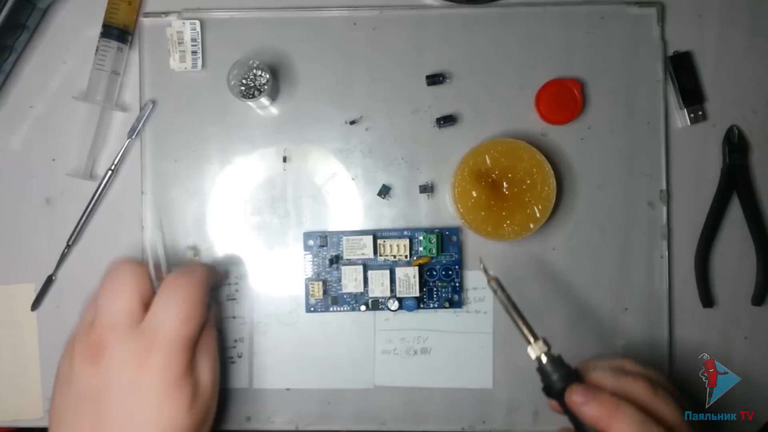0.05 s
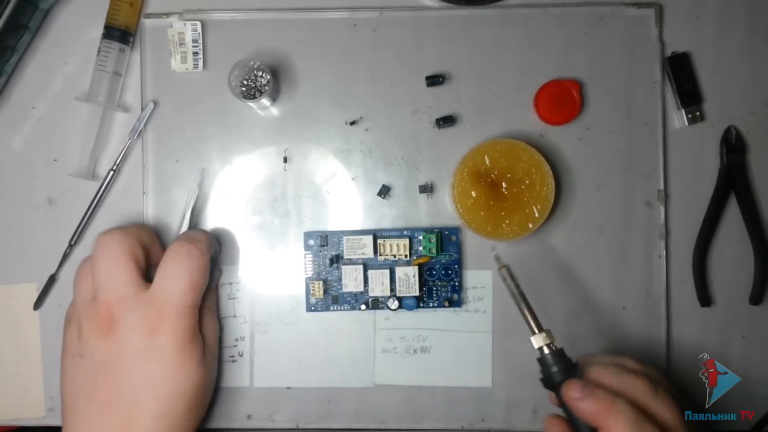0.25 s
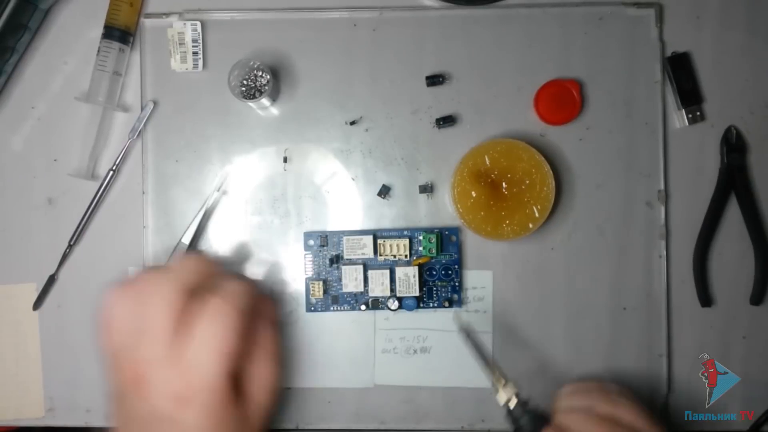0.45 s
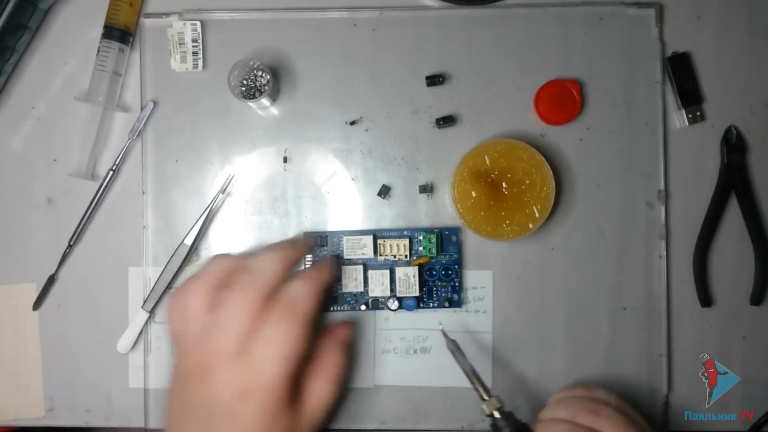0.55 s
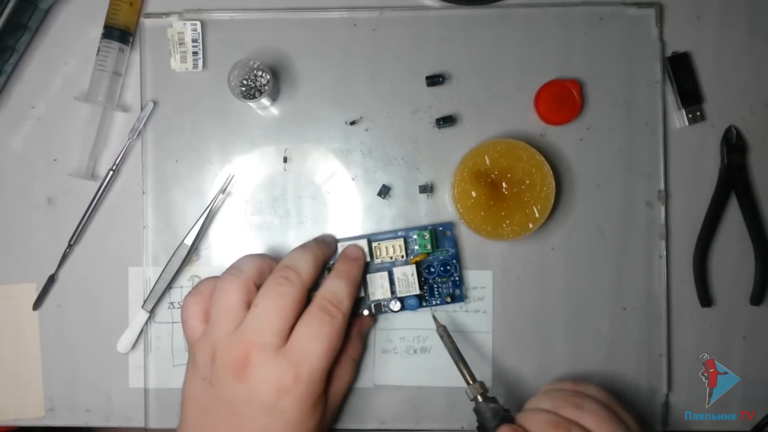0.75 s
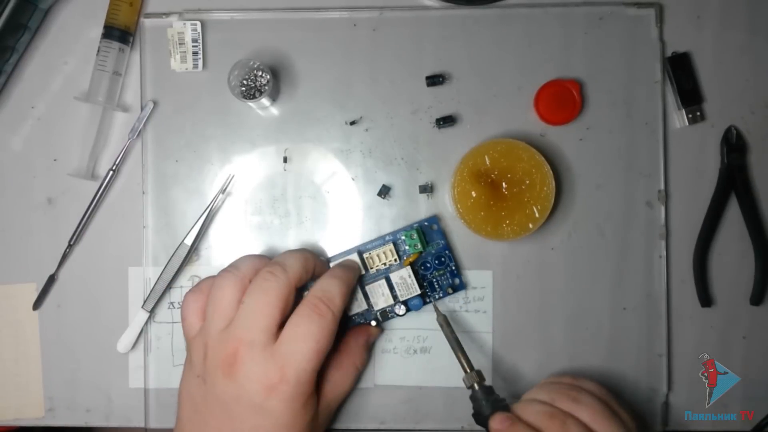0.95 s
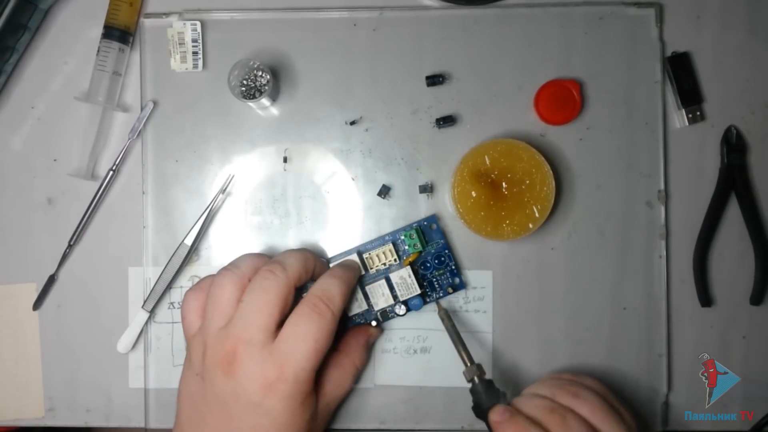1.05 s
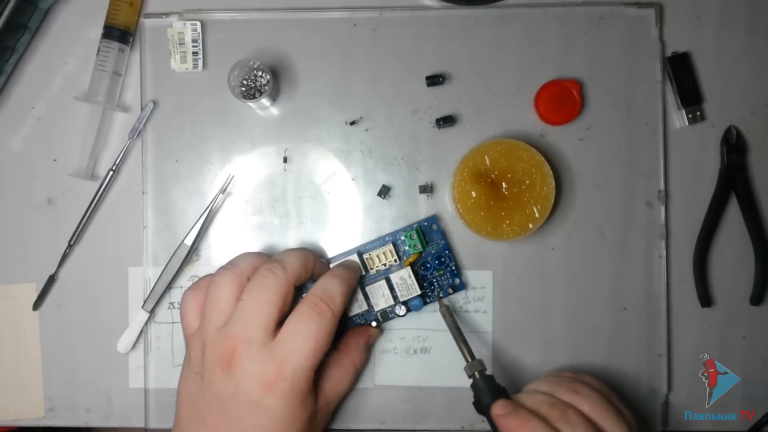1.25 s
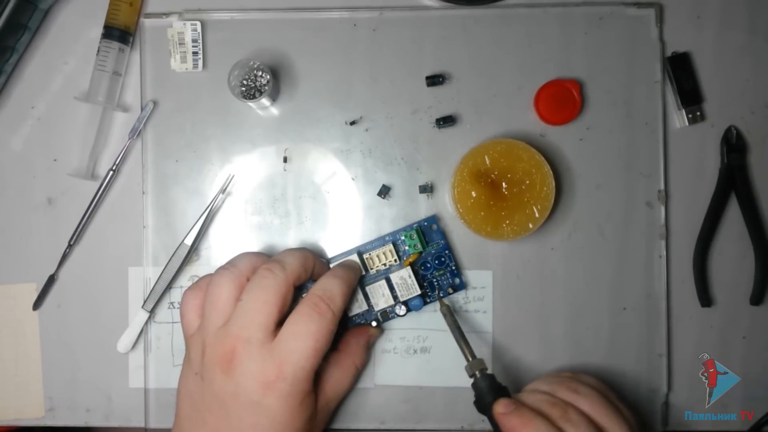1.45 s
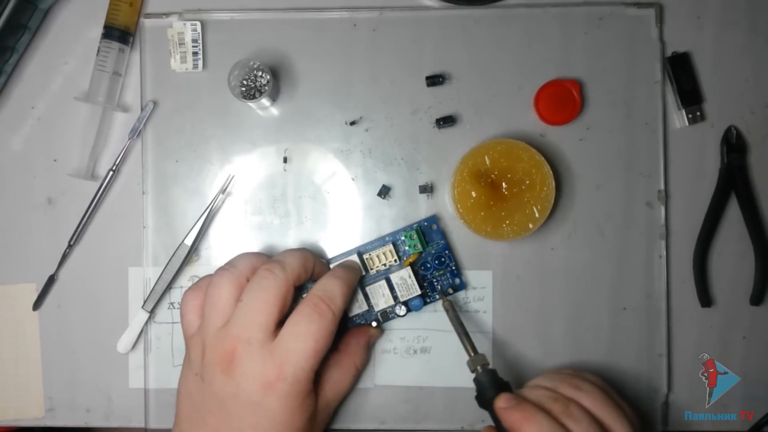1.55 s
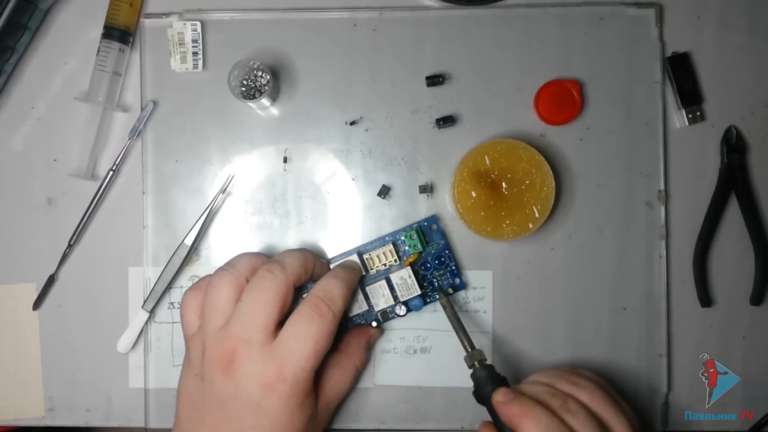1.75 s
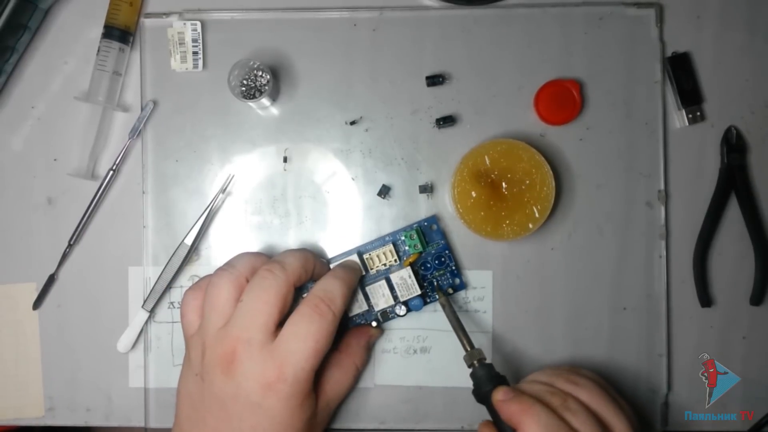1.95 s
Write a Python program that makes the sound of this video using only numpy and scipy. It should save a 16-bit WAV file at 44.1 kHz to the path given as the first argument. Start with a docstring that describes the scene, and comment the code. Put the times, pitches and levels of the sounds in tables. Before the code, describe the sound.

Steel tweezers dropped on glass rattle brightly to rest, followed by dull circuit board taps

```python
"""A quiet room hums, rumbles and hisses throughout, as shaped noise and narrow noise bands.
At 0.22 s steel tweezers drop on a glass-topped bench: struck modes ring, clack and crack, chattering to rest.
From 0.78 s a small circuit board, nearer the microphones, taps the glass with duller struck modes.
From about 1 s fingers and tip scuff softly, as swells of noise. Two close microphones take the hits and
their room sound, each with its own treble colour."""
import sys
import numpy as np
from scipy import signal
from scipy.fft import rfft, irfft
from scipy.io import wavfile
from scipy.ndimage import uniform_filter1d

SR = 44100
rng = np.random.default_rng(int(sys.argv[2]) if len(sys.argv) > 2 else 0)


def elevation(decibels):
    """Turn decibel levels (scalar or array-like) into linear amplitude ratios."""
    levels = np.asarray(decibels, float)
    return 10 ** (levels / 20)


def dump_mix(stems):
    """Bounce the given channels to the path in sys.argv[1] as a 16-bit WAV at rate SR."""
    frames = np.atleast_2d(stems).T  # one column per channel
    limited = np.clip(frames, -1, 1)  # hard clip at full scale
    pcm = np.round(limited * 32767).astype(np.int16)
    wavfile.write(sys.argv[1], SR, pcm)


N = 88200

# the tweezers strike the glass; clack and body levels are relative to the blow, pan is left over right:
# (t/s, blow level/dB, clack level/dB, clack f/Hz, glass body level/dB, pan/dB)
TWEEZER_BOUNCES = [(0.2177, -11, -21.5, 3275, -24, -2), (0.2303, -20, -20.5, 3150, -26, -2.5),
                   (0.2694, -19.5, -12.5, 3130, -17.5, -3.5), (0.291, -19.5, -7, 3230, -23.5, 3),
                   (0.3116, -18.5, -16.5, 3070, -21, -4.5), (0.3296, -11.5, -19, 3100, -22, -7),
                   (0.338, -14, -19.5, 3200, -18.5, -1.5), (0.3521, -17.5, -20.5, 3090, -10.5, -1),
                   (0.3716, -13.5, -11, 3100, -11.5, -0.5), (0.3863, -17, -17, 3140, -14.5, -5),
                   (0.3951, -16.5, -19, 3000, -13, -1), (0.42, -17, -10, 3410, -13.5, 2.5),
                   (0.4339, -12.5, -14.5, 3210, -19.5, -7), (0.4410, -22, -10.5, 3200, -24, 13.5),
                   (0.4524, -22, -22.5, 2990, -17, -2), (0.4636, -18, -25.5, 3000, -24, -6),
                   (0.4755, -17, -13, 3090, -18.5, -4), (0.4926, -17, -13.5, 3280, -17, -9.5),
                   (0.5124, -23, -8.5, 3100, -18, 12.5), (0.52, -23, -18, 3120, -26, -2.5),
                   (0.5344, -22.5, -16, 3500, -18, 3.5), (0.5441, -25, -21.5, 3400, -29.5, 11),
                   (0.562, -19.5, -30, 3150, -38, -6)]


def rms_one(x):
    """Scale to unit rms."""
    return x / np.sqrt(np.mean(x ** 2) + 1e-30)


def at_hz(points, hz):
    """Read a (f/Hz, value) table on a log frequency axis."""
    table_hz, values = np.array(points).T
    return np.interp(np.log(np.maximum(hz, 1)), np.log(table_hz), values)


def coloured(spectrum, alike=1.0):
    """Stereo noise with the given spectrum and left-right likeness (clipped to 0..1); rms 1."""
    hz = np.fft.rfftfreq(N, 1 / SR)
    mid, side = rfft(rng.standard_normal((2, N)))
    likeness = np.clip(at_hz(alike, hz) if np.ndim(alike) else alike, 0, 1)
    pair = np.sqrt(1 + likeness) * mid + np.sqrt(1 - likeness) * side * [[1], [-1]]
    return rms_one(irfft(elevation(at_hz(spectrum, hz)) * pair, N))


def high_pass(x, hz):
    """Steep bass cut: fourth-order Butterworth."""
    return signal.sosfilt(signal.butter(N=4, Wn=hz, btype="high", fs=SR, output="sos"), x)


def ring(clicks, hz, t60):
    """A two-pole resonator: a unit click sets a sine of height 1 ringing, 60 dB down after t60 seconds."""
    r = elevation(-60 / (t60 * SR))
    w = 2 * np.pi * hz / SR
    return signal.lfilter([0, np.sin(w)], [1, -2 * r * np.cos(w), r * r], clicks + 1e-18)


def train(s, size, pan_db):
    """Stereo clicks at the given times; positive pan is louder on the left."""
    out = np.zeros((2, N))
    for ch, sign in enumerate((.5, -.5)):
        np.add.at(out[ch], (s * SR).astype(int), size * elevation(sign * pan_db))
    return out


def strike(modes, s, db, pan_db, spread_db, scatter_db):
    """Every blow strikes every mode with its own strength, sign and slightly different balance."""
    luck = rng.standard_normal(size=(len(s), len(modes), 3))
    total = 0
    for k, (hz, mode_db, t60) in enumerate(modes):
        size = elevation(db + mode_db + spread_db * luck[:, k, 0]) * np.sign(luck[:, k, 1])
        total = total + ring(train(s, size, pan_db + scatter_db * luck[:, k, 2]), hz, t60)
    return total


def crack(s, db, pan_db, t60, alike):
    """Contact noise at each blow: it swells in under a millisecond and dies within milliseconds."""
    # colour of the contact: (f/Hz, level per Hz/dB)
    contact = [(180, -57), (300, -38), (803, -17.5), (915, -26.5), (2450, -16.5), (3080, 0), (3940, -8.5),
               (8520, -1), (13700, -11), (15100, -24.5)]
    rise = np.exp(-1 / (0.00047 * SR))   # rise time constant 0.47 ms
    poles = np.convolve([1, -rise], [1, -elevation(-60 / (t60 * SR))])
    envelope = signal.lfilter([1 - rise], poles, train(s, elevation(db), pan_db))
    return coloured(contact, alike) * envelope


def background():
    """Deep rumble, room rumble with a wavering hum of noise-driven resonances, and hiss."""
    # how the background level drifts: (t/s, deep rumble level/dB, hum and rumble level/dB, hiss level/dB)
    drift = [(0, -70, -57.5, -62.5), (0.1, -68, -59, -64), (.3, -89, -61, -67.5),
             (0.721, -76.5, -64, -68.5), (1.0, -79, -66.5, -69.5), (1.3, -81.5, -67.5, -71),
             (1.499, -69.5, -64.5, -66.5), (1.701, -69.5, -61.5, -65.5), (2, -64.5, -60.5, -64)]
    # noise colours: (f/Hz, level per Hz/dB)
    deep_colour = [(15, -49), (25, -16), (49, -18), (81, 14.5), (120, -12), (160, -51.5), (260, -120)]
    rumble_colour = [(65, -44), (110, -13), (209, 7), (260, -5.5), (446, -8), (796, -8.5), (907, -9.5),
                     (1000, -21.5), (1560, -52.5), (2640, -120)]
    hiss_colour = [(590, -32.5), (1000, 2.5), (3570, -1), (5690, -6), (7560, -7), (8190, -1.5), (8870, -8),
                   (13400, -12), (14600, -16.5), (15100, -25.5)]
    # hum bands: (f/Hz, level over the rumble/dB, approximate width/Hz)
    hum_bands = [(217, -10.5, 22), (886.4, -15, 6), (84, -16, 5.4)]
    # how alike the background is left and right: (f/Hz, left-right likeness before clipping)
    likeness = [(60, 0.91), (180, 1), (540, 0.64), (1630, -0.33), (4890, -0.11), (14700, -1.4)]
    s, *levels_db = np.transpose(drift)
    deep, rumble, hiss = (elevation(np.interp(np.arange(N) / SR, s, db)) for db in levels_db)
    hum = sum(elevation(db) * rms_one(ring(rng.standard_normal(N), hz, 1.9 / width))
              for hz, db, width in hum_bands)
    return (deep * coloured(deep_colour, likeness)
            + rumble * (coloured(rumble_colour, likeness) + hum)
            + hiss * coloured(hiss_colour, likeness))


def soft_knocks(knocks, softness, hz, t60):
    """Clicks blunted over some samples of contact ring one low mode."""
    s, db = np.transpose(knocks)
    return ring(uniform_filter1d(train(s, elevation(db), 0), size=softness), hz, t60)


def tweezers():
    """Firm bounces plus random chatter ring the steel and the glass, with cracks and low knocks."""
    # the loose tips chatter; the floor of their level: (t/s, level/dB)
    chatter = [(0.219, -39), (.3, -48), (.34, -49), (.5, -38), (.55, -34), (0.592, -38), (0.622, -45.5),
               (.65, -80)]
    # tweezers mode frequencies (f/Hz), and in the same order (level/dB, t60/s)
    steel_hz = [4407, 4845, 5934, 6235, 6640, 7012, 7237, 7892, 8270, 8582, 8900, 10004, 11319, 12232,
                13347]
    steel_ring = [(-14, .15), (-17.5, 0.1), (-18.5, 0.069), (0.5, 0.051), (-11.5, 0.089), (-11, 0.2),
                  (-10, 0.14), (-10.5, 0.22), (2.5, 0.032), (-6, 0.18), (-9.5, 0.094), (-10, 0.28),
                  (-4, 0.14), (-7, 0.12), (-10, 0.25)]
    # steel modes hardly struck until the tweezers roll over (f/Hz)
    shielded_hz = [6235, 8582, 10004]
    # body modes of the glass top: (f/Hz, level/dB, t60/s)
    glass = [(757, -16.5, 0.04), (802, -13.5, 0.061), (1063, -17, .03), (1197, -11, 0.05),
             (1544, -12.5, .02), (1875, -12.5, 0.022), (2114, -5, 0.018), (4460, -0.5, 0.014)]
    # light touches clack: (f/Hz, level/dB, t60/s)
    chatter_clack = [(2920, -9.5, 0.0023), (3150, -15, .007), (3200, -13.5, .007)]
    # low thuds of the bench during the clatter: (t/s, click level/dB)
    thuds = [(.24, -51), (0.288, -59), (0.336, -50.5), (0.364, -49.5), (0.45, -63.5), (0.498, -55)]
    # flat landings also knock low: (t/s, click level/dB)
    knocks = [(0.2186, -47.5), (0.2966, -56.5), (.33, -44.5), (0.3934, -45.5)]
    chatter_count, chatter_spread_db = 170, 4
    steel_db, glass_db, crack_db = -23.5, -7.5, -8.5   # added to the blow level
    roll_s, shield_db = .32, -9
    rest_s, rest_db_per_s = 0.531, 159   # lying flat on the glass damps the steel

    s, db, _, _, body_db, pan_db = np.transpose(TWEEZER_BOUNCES)
    when, level_db = np.transpose(chatter)
    c_s = when[0] + (when[-1] - when[0]) * rng.random(chatter_count)
    excess = np.minimum(rng.exponential(1, chatter_count), 3)
    c_db = np.interp(c_s, when, level_db) + chatter_spread_db * excess
    all_s, all_db = np.r_[s, c_s], np.r_[db, c_db]
    all_pan = np.r_[pan_db, np.full(chatter_count, -4.0)]
    all_body = np.r_[body_db, np.full(chatter_count, -15.0)]

    modes, shielded = np.c_[steel_hz, steel_ring], np.isin(steel_hz, shielded_hz)
    steel = 0
    for late in (False, True):
        blow_db = all_db + steel_db + late * shield_db * (all_s < roll_s)
        steel = steel + strike(modes[shielded == late], all_s, blow_db, all_pan, spread_db=4.5, scatter_db=6.5)
    damping = elevation(-rest_db_per_s * np.maximum(np.arange(N) / SR - rest_s, 0))
    bright = (damping * steel
              + strike(chatter_clack, c_s, c_db, -0.84, spread_db=4.0, scatter_db=3.5)
              + crack(all_s, all_db + crack_db, all_pan, t60=0.012, alike=.4))
    body = strike(glass, all_s, all_db + all_body + glass_db, 0.37 * all_pan, spread_db=6.0, scatter_db=3.5)
    return (high_pass(bright, 1200) + high_pass(body, 620)
            + soft_knocks(thuds, softness=150, hz=130.1, t60=0.17)
            + soft_knocks(knocks, softness=30, hz=434, t60=0.017))


def clacks():
    """Each bounce rings one short mode at the pitch of the spot it hits."""
    gain_db, t60 = 6.5, .009   # added to every clack; s
    total = 0
    for s, db, clack_db, hz, _, pan_db in TWEEZER_BOUNCES:
        click = train(np.array([s]), elevation(db + clack_db + gain_db), 0.33 * pan_db)
        total = total + ring(click, hz, t60)
    return total


def room(x):
    """Quick scatter off the bench and a longer tail, as dying noise of its own in each ear."""
    t = np.arange(SR // 2) / SR
    tails = 0
    # bench, then room: level/dB, t60/s, gap before the first reflection/s
    for db, t60, gap in ((4, 0.019, .0006), (0.5, 0.17, 0.0056)):
        tail = rng.standard_normal((2, len(t))) * elevation(-60 * t / t60) * (t > gap)
        tails = tails + elevation(db) * tail / np.sqrt((tail ** 2).sum(axis=1, keepdims=True))
    return signal.fftconvolve(x, tails, axes=1)[:, :N]


def board():
    """Dull plastic-and-fibre taps; where the board is hit sets each tap's share of the mode groups."""
    # taps on the glass, shares relative to the tap: (t/s, tap level/dB, then level/dB of
    # flat body, edge, middle, upper middle, treble, top)
    tap_table = [(0.7800, -35, -36, -28, -7.5, -15, -24, 3), (0.7818, -32.5, -23, -8.5, -10, -7, -11, -0.5),
                 (0.7929, -20.5, -32, -23, -41, -21, -17, -2), (0.8084, -35, -28, -27, -14, -15, -7.5, 1),
                 (0.8181, -44, -17, -16, -21, -6, -24, -7), (1.0238, -34, -13.5, -13.5, -2.5, -8, -12, 0),
                 (1.208, -47, -36, -5, -13, -4, 2, -3.5)]
    # board modes, in the order of the shares: (f/Hz, level/dB, t60/s)
    flat_body = [(530, 0.5, 0.093), (789, 9.5, 0.051), (1187, 3.5, 0.053)]
    edge = [(927, 1, 0.036), (1065, -4, .02), (1794, -3.5, 0.031), (1970, -6.5, 0.024)]
    middle = [(2240, -1.5, 0.0086), (2707, -1.5, 0.0086), (3096, 6.5, 0.0062)]
    upper_middle = [(3580, 6.6, 0.0061), (4080, 3.9, 0.016)]
    treble = [(5060, 5.5, 0.01), (6200, 3.3, 0.0089), (6800, 1.3, 0.017)]
    top = [(7880, -5.5, 0.007), (8230, -3, 0.017), (9200, -11.5, 0.012), (9810, -40, 0.01),
           (12700, -33, .006)]
    pan_db, crack_db = -2, -9
    s, db, *shares_db = np.transpose(tap_table)
    groups = (flat_body, edge, middle, upper_middle, treble, top)
    taps = sum(strike(modes, s, db + share_db, pan_db, spread_db=3.5, scatter_db=4.5)
               for modes, share_db in zip(groups, shares_db))
    return high_pass(taps + crack(s, db + crack_db, pan_db, t60=0.023, alike=0.27), 430)


def scuffs():
    """Fingers and tip scuff: short half-sine swells of soft bright noise."""
    # the swells: (t/s, length/s, level/dB)
    swells = [(0.989, 0.038, -65), (1.373, 0.043, -67.5), (1.619, 0.034, -66), (1.791, 0.045, -62),
              (1.956, 0.047, -63)]
    # their colour: (f/Hz, level per Hz/dB)
    colour = [(800, -8), (3000, 1.5), (5000, 4), (8200, 3.5), (11000, 0), (15000, -6)]
    t = np.arange(N) / SR
    swell = sum(elevation(db) * np.sin(np.pi * np.clip((t - s) / length, 0, 1)) for s, length, db in swells)
    return coloured(colour, 0.29) * swell


def microphones(direct, reflected):
    """Direct sound reaches the left a little later; a resonance lifts each microphone's own treble band."""
    # left microphone, then right: (f/Hz, width/Hz, lift/dB)
    peaks = [(6130, 760, 9), (7790, 2100, 6)]
    left_lag_s = .00009
    hz = np.fft.rfftfreq(N, 1 / SR)
    lift = np.array([1 + (elevation(db) - 1) * hz * width / (hz * width + 1j * (hz ** 2 - f ** 2))
                     for f, width, db in peaks])
    lag = np.exp(-2j * np.pi * hz * left_lag_s * np.array([[1], [0]]))
    return irfft((rfft(direct) * lag + rfft(reflected)) * lift, N)


def scene():
    """Tweezers and board with their room sound at the microphones, over scuffs and background."""
    steel, clack, taps = tweezers(), clacks(), board()
    # the clack stays in the glass, and the board lies nearer: both send less to the room
    to_room = steel + elevation(-7) * clack + elevation(-8) * taps
    hits = microphones(steel + clack + taps, room(to_room))
    return hits + scuffs() + background()


def low_pass(x):
    """Removes everything above the highest recorded frequency."""
    return signal.sosfilt(signal.butter(12, 15280, fs=SR, output="sos"), x)


def record(dry):
    """A steep low-pass, 60 dB down from 15.3 kHz, takes off the top."""
    top_cut = signal.cheby2(12, 60, 15300, fs=SR, output="sos")
    mix = signal.sosfilt(top_cut, dry)
    return low_pass(mix)


dry = scene()
out = record(dry)
dump_mix(out)
```